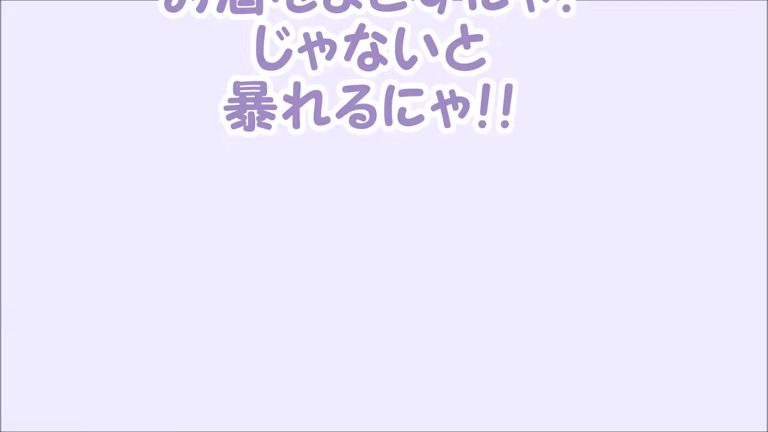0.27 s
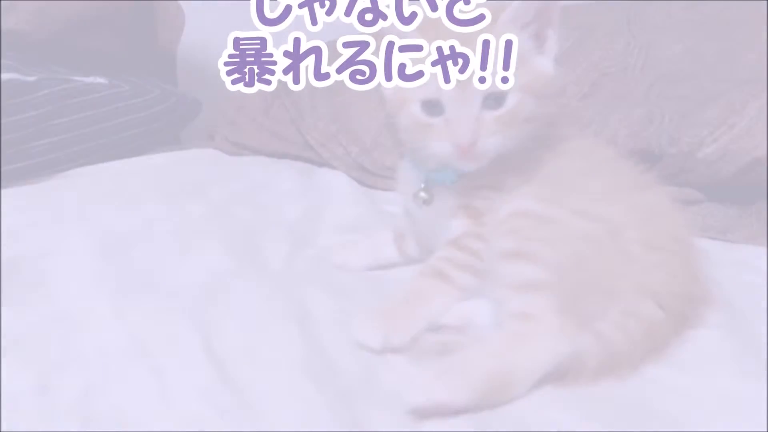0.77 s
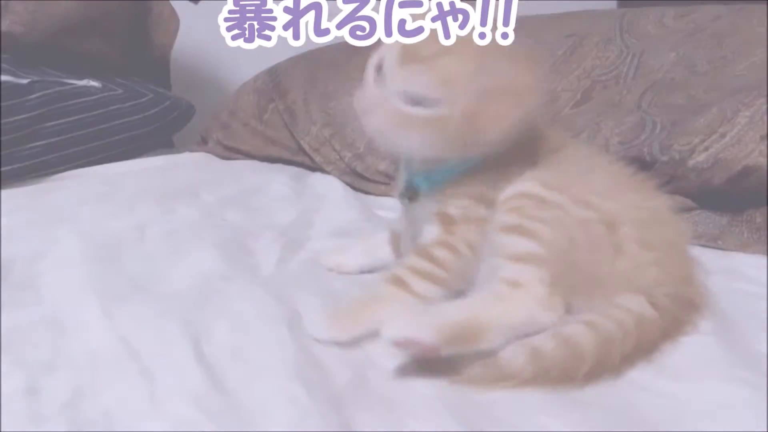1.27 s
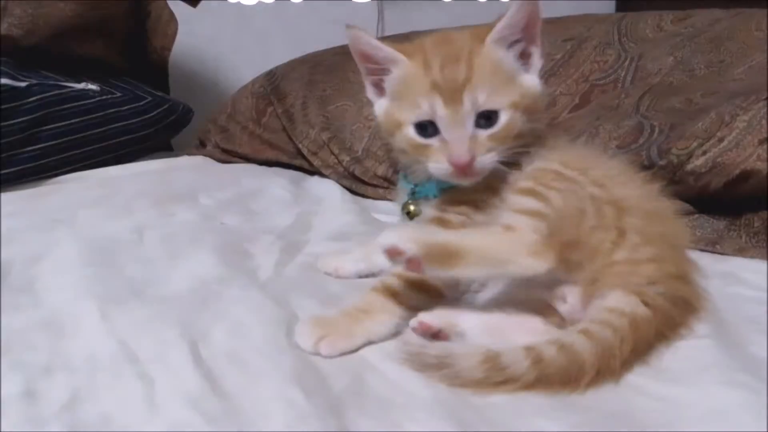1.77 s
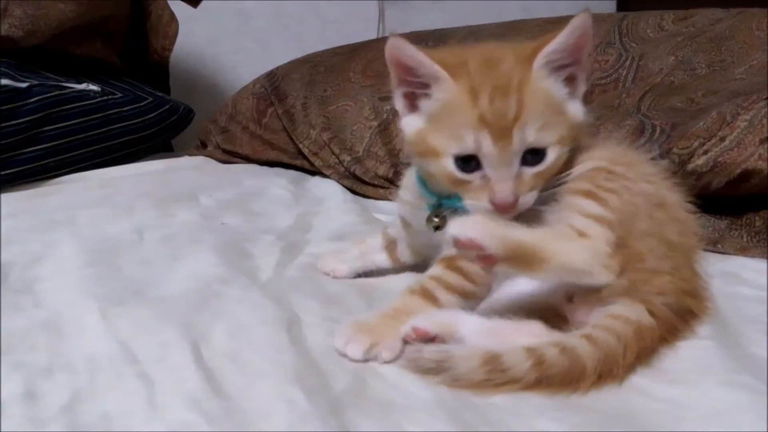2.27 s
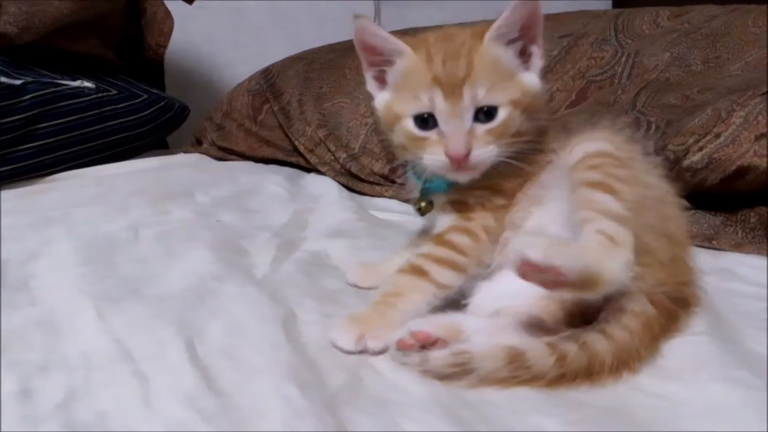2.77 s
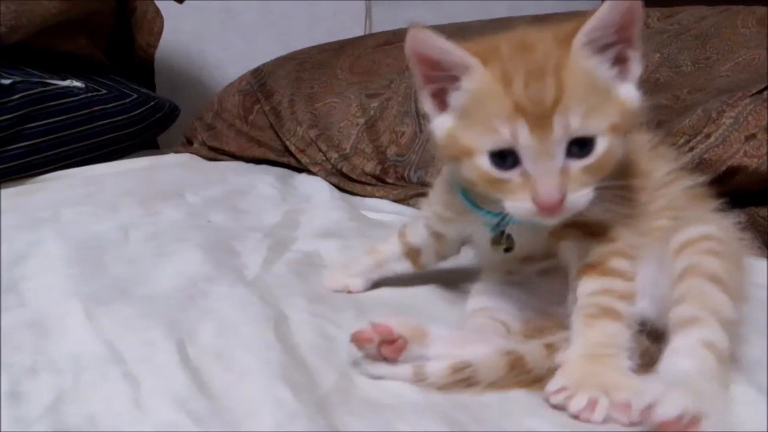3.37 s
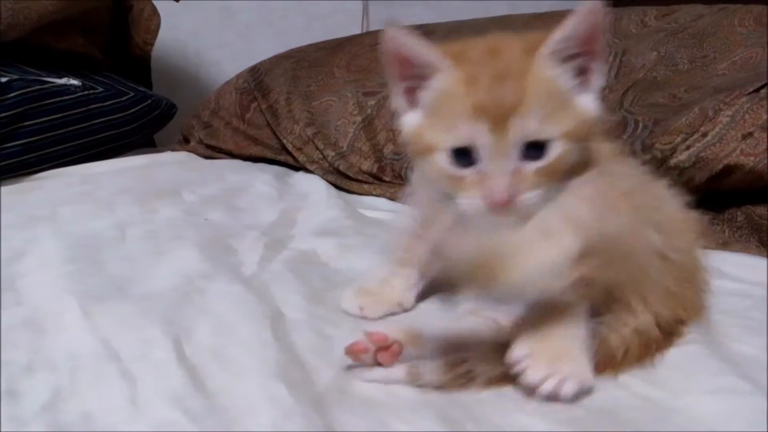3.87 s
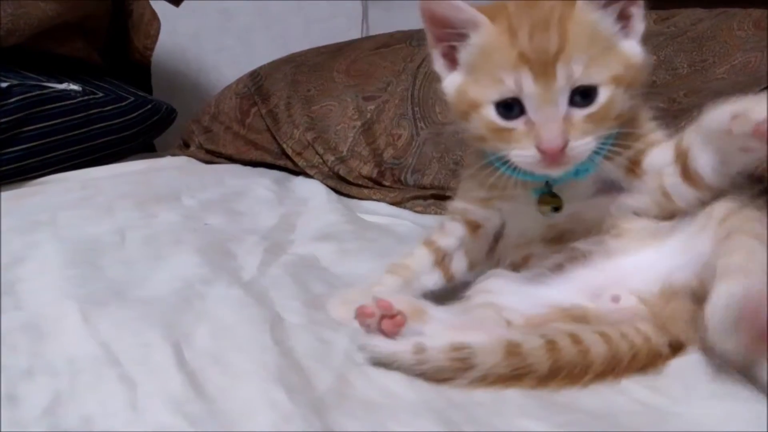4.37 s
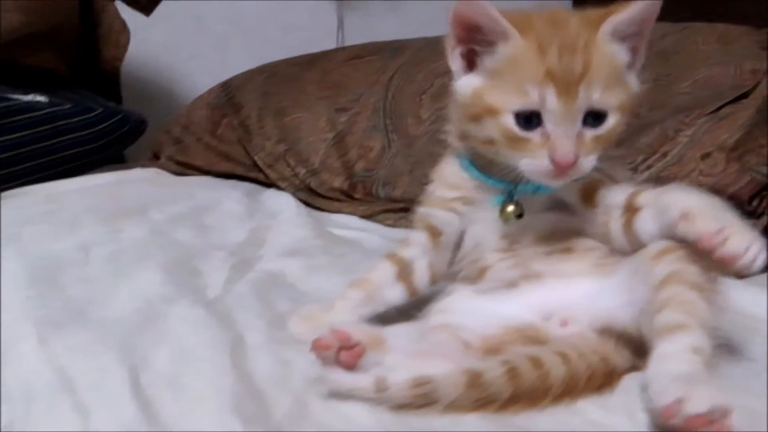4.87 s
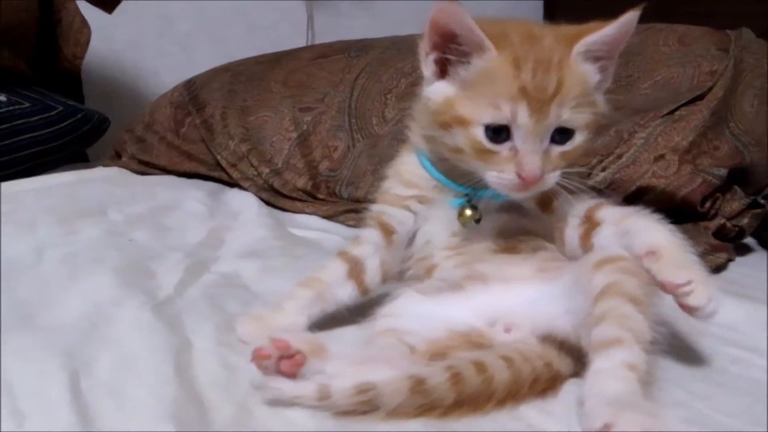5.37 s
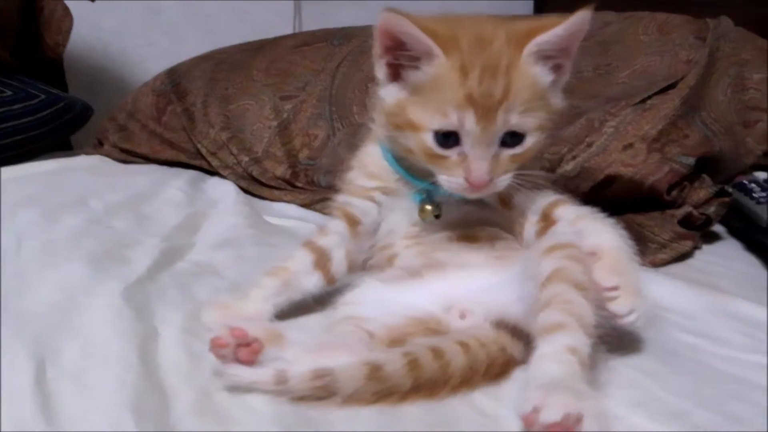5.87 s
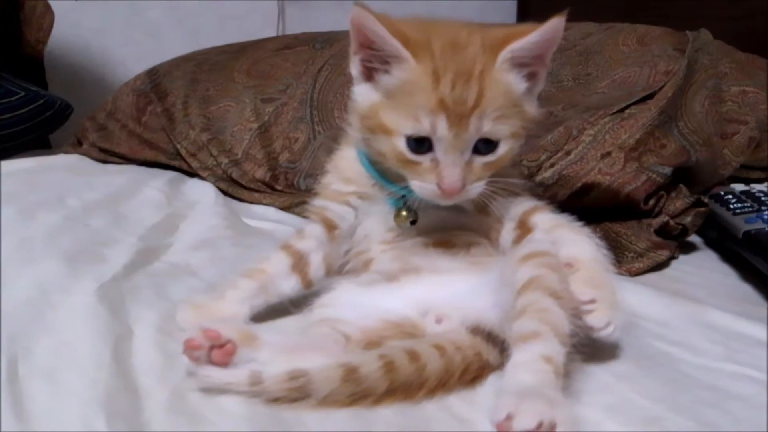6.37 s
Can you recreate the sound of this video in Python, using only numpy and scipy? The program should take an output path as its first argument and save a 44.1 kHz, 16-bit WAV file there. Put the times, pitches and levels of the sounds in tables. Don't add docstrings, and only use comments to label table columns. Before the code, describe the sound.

Quiet room, close hand-held microphone: low handling rumble, sharp plastic clicks and knocks, soft fur and cloth rustle, one bright bell clink with brief damped tinkles.

```python
import sys
import numpy as np
from scipy import signal
from scipy.fft import rfft, irfft, next_fast_len
from scipy.io import wavfile
from scipy.ndimage import uniform_filter1d

SR = 44100
rng = np.random.default_rng(int(sys.argv[2]) if len(sys.argv) > 2 else 0)


def level_to_linear(level):
    exponent = np.asarray(level, float) / 20
    return 10 ** exponent


def generate_wav(signal):
    frames = np.transpose(np.atleast_2d(signal))
    scaled = np.clip(frames, -1, 1) * 32767
    pcm = np.round(scaled).astype(np.int16)
    wavfile.write(sys.argv[1], SR, pcm)


N = 292383
ONSET_SHIFT_S = 0.000908

# f/Hz, density/dB
HISS_SPECTRUM = [(20, -10.5), (100, -2.5), (250, -8.5), (600, -13), (2500, -22), (5000, -25.5), (9000, -26),
                 (17000, -31)]


def evened(x):
    return x / np.sqrt(np.mean(x ** 2) + 1e-20)


def read(points, hz):
    f, value = np.transpose(points)
    return np.interp(np.log(hz + 1), np.log(f + 1), value)


def curve(rows, column):
    return np.interp(np.arange(N) / SR, [r[0] for r in rows], [r[column] for r in rows])


def noise(points):
    size = next_fast_len(N)
    spectrum = rfft(rng.standard_normal(size))
    shape = level_to_linear(read(points, np.fft.rfftfreq(size, 1 / SR)))
    return evened(irfft(spectrum * shape, size)[:N])


def mode(hz, t60, rise=0., turn=0.):
    t60 = max(t60, .001)
    t = np.arange(int(t60 * SR) + 40) / SR
    attack = 1 - np.exp(-t / (rise + 1e-6))
    return np.sin(2 * np.pi * (hz * t + turn)) * level_to_linear(-60 * t / t60) * attack


def add(mix, s, sound):
    part = mix[round(s * SR):][:len(sound)]
    part += sound[:len(part)]


def hiss():
    return noise(HISS_SPECTRUM) * level_to_linear(-54.5)


def swaying(effort_db):
    # t/s, peak level/dB, t60/s
    jolts = [
        (.92, -42.5, 0.32),
        (3.1, -48.5, 0.46),
        (4.52, -36, 0.37),
        (4.77, -40.5, 0.49),
        (5.03, -41.5, 0.85),
        (5.37, -41.5, 1.1),
        (5.75, -39.5, 0.34),
        (6.41, -38.5, 0.25),
    ]
    sway_db, sway_per_effort, rise_db_per_s = -55.5, 0.9, 600
    t = np.arange(N) / SR
    power = level_to_linear(sway_db + sway_per_effort * effort_db) ** 2
    for s, db, t60 in jolts:
        swell_db = np.minimum(rise_db_per_s * (t - s), -60 * (t - s) / t60)
        power = power + level_to_linear(db + swell_db) ** 2
    return np.sqrt(power)


def hand():
    # t/s, effort level/dB
    grip = [
        (0.47, -0.5),
        (0.8, 0),
        (1.2, 1),
        (2.0, -1.5),
        (4.2, -1),
        (4.6, 4.5),
        (5.4, 5.5),
        (6.2, 4),
        (6.6, -1.5),
    ]
    # f/Hz, density/dB
    sway_spectrum = [(12, -14), (25, 8), (60, 7.5), (100, -7.5), (200, -37.5)]
    # f/Hz, density/dB
    rumble_spectrum = [(50, -18), (90, -1.5), (250, -3), (600, -15), (1500, -32.5)]
    # t/s, peak level/dB, f/Hz, t60/s, direction
    swings = [
        (4.5103, -22, 235, .018, 1),
        (4.541, -25, 45, .1, 1),
        (5.7355, -29, 45, .09, 1),
        (2.7855, -26, 2100, .0015, 1),
        (4.8812, -20, 2100, .004, 1),
        (4.881, -15, 4300, .0016, 1),
        (6.3961, -7, 620, .003, -1),
    ]
    effort_db = curve(grip, column=1)
    out = noise(sway_spectrum) * swaying(effort_db) + noise(rumble_spectrum) * level_to_linear(-59.5 + effort_db)
    for s, db, hz, t60, way in swings:
        add(out, s, way * level_to_linear(db) * mode(hz, t60, rise=0.1 / hz))
    return out


def stirring():
    # middle t/s, length/s, level/dB, duller part re rustle/dB
    stirs = [(.72, .3, -64, -10), (1.0, .15, -66, -8), (1.248, .25, -60, -4), (1.5, .3, -70, -8),
             (1.98, 0.21, -65.5, -10), (2.416, 0.18, -60.5, -4), (2.95, 0.48, -64.5, -5),
             (3.21, .3, -60.5, -8), (3.61, 0.13, -58.5, -10), (3.78, 0.38, -64.5, -6),
             (4.028, 0.29, -64, -4), (4.35, .35, -70, -8), (4.722, 0.34, -66, -4), (4.95, 0.29, -64, -10),
             (5.17, 0.38, -68, -5.5), (5.457, 0.29, -60.5, 3.5), (5.814, 0.31, -66, 8.5),
             (6.13, 0.24, -71, 7)]
    strong = np.full(N, level_to_linear(-71) ** 2)
    wide = strong * level_to_linear(-7) ** 2
    for middle, length, db, dull_db in stirs:
        power = level_to_linear(db) ** 2 * np.hanning(int(length * SR))
        add(strong, middle - length / 2, power)
        add(wide, middle - length / 2, power * level_to_linear(dull_db) ** 2)
    return strong, wide


def cloth():
    # f/Hz, density/dB
    cloth_spectrum = [(1200, 5.5), (2500, 4.5), (4000, 8), (6000, 13.5), (10000, 7.5), (12000, -54),
                      (16000, -27)]
    # f/Hz, width/Hz
    port = (7780, 1800)
    # t/s, level/dB, rise/s, t60/s, duller part re scuff/dB
    scuffs = [(1.054, -50, .003, 0.19, -7), (4.512, -48, .003, 0.09, -10), (4.608, -48.5, 0.0033, 0.13, 3),
              (4.881, -61, 0.0017, 0.21, 11), (5.063, -50, 0.008, 0.26, 2), (5.245, -59, .004, 0.12, 5),
              (5.542, -53.5, 0.004, 0.58, 6.5), (5.614, -57, 0.0039, 0.15, 6),
              (5.773, -63, 0.0029, 0.038, 11.5), (5.988, -47.5, 0.027, 0.16, 1.5),
              (6.252, -65.5, 0.0037, 0.34, 11.5), (6.426, -53.5, 0.0032, 0.12, 7.5),
              (6.461, -56.5, 0.0064, 0.17, 10.5)]
    grain = level_to_linear(1.2 * evened(uniform_filter1d(rng.standard_normal(N), size=60)))
    rub = noise(cloth_spectrum) * grain
    b, a = signal.butter(1, [port[0] - port[1] / 2, port[0] + port[1] / 2], "band", fs=SR)
    bright = evened(signal.lfilter(b, a, signal.lfilter(b, a, rub)))
    dull = evened(rub)
    strong, wide = stirring()
    t = np.arange(SR // 4) / SR
    for s, db, rise, t60, dull_db in scuffs:
        decay = level_to_linear(db - 60 * np.maximum(t - rise, 0) / t60)
        power = (decay * np.minimum(t / rise, 1)) ** 2
        add(strong, s, power)
        add(wide, s, power * level_to_linear(dull_db) ** 2)
    return bright * np.sqrt(strong) + dull * np.sqrt(wide)


def cracks():
    # t/s, peak level/dB, port ring f/Hz, lower click re
    # peak/dB, lower click f/Hz
    singles = [(0.84, -21, 7750, -50, 6500), (0.9287, -10, 7920, -18, 6340), (1.0509, -26, 7600, -15, 5250),
               (2.3575, -42, 8200, -30, 6000), (2.6195, -41, 8400, -28, 6500),
               (1.1573, -20, 7800, -52, 6500), (2.4003, -38, 8540, -30, 2620), (2.702, -42, 9240, -28, 3830),
               (2.708, -40, 8900, -31, 2580), (3.0026, -39.5, 7900, -7, 3720),
               (3.08735, -21, 7550, -17, 6140), (3.088, -23.5, 7600, -8, 5950),
               (3.1125, -34.5, 7420, -10, 6220), (4.2939, -20, 7730, -16.5, 6200),
               (4.29456, -30, 7500, -18, 6000), (4.3191, -44, 8000, -8, 5840),
               (4.5091, -3.5, 7940, -24, 5800), (4.5318, -28, 7740, -23, 4580),
               (4.8801, -14, 7640, -15.5, 2920), (4.8847, -32, 7790, -6, 2600),
               (5.748, -30, 7820, -24, 5270), (5.862, -27.5, 7300, -12, 5750), (5.9578, -38, 7200, -5, 5650)]
    # t/s, peak level/dB, lower click re peak/dB, lower click f/Hz
    creeps = [(4.6511, -23.5, -13, 6240), (4.6662, -24, -20, 6400), (4.6792, -27, -17, 6440),
              (4.7176, -17.5, -25, 6500), (4.7483, -20.5, -34, 4940), (4.7743, -26.5, -26, 5330),
              (4.804, -22.5, -32, 5170), (4.8556, -15.5, -23, 6560), (4.877, -22, -18, 6000),
              (4.9637, -25.5, -20.5, 5600), (5.0125, -22, -22, 5550), (5.0393, -23, -13, 6150),
              (5.3054, -22.5, -21, 6500), (5.3649, -31, -26, 6350), (5.394, -31.5, -17, 6000),
              (5.7344, -18, -19.5, 6100), (5.901, -18.5, -19.5, 6200), (6.315, -18.5, -30, 6500)]
    seam_hz = 8050
    ring_s, ring_s_per_db, ring_max_s = .0022, .00004, .005
    ring_slope = 4
    out = np.zeros(N)
    t = np.arange(1500) / SR
    slips = singles + [(s, db, seam_hz, low_db, low_hz) for s, db, low_db, low_hz in creeps]
    room_band = signal.butter(1, [5000, 11500], "band", fs=SR)
    tails = signal.lfilter(*room_band, rng.standard_normal((len(slips), 1500)))
    for (s, db, hz, low_db, low_hz), delay, tail in zip(slips, rng.random(len(slips)), tails):
        t60 = min((ring_s - ring_s_per_db * db) * (seam_hz / hz) ** ring_slope, ring_max_s)
        one = level_to_linear(-23.5 - 60 * t / 0.018) * tail
        add(one, 0, -mode(hz, t60, rise=.00008))
        add(one, 0, -level_to_linear(low_db + 18.5) * mode(low_hz, 13 / low_hz, rise=.00008))
        add(one, 0, level_to_linear(-12) * mode(10000, .0011, rise=.00008))
        add(one, 0, -level_to_linear(-21) * mode(12500, .0018, rise=.00008))
        add(one, 0.00041 + 0.00063 * delay, 0.09 * one.copy())
        add(out, s + ONSET_SHIFT_S, level_to_linear(db) * one / abs(one).max())
    out = signal.lfilter(*signal.butter(1, 1800, "high", fs=SR), out)
    return signal.lfilter(*signal.butter(2, 13500, fs=SR), out)


def knocks():
    # t/s, thud peak level/dB, panel re thud/dB, shell re thud/dB
    presses = [(0.93, -30.5, 15, 3.5), (1.5969, -40, 2, -1.5), (1.8824, -38.5, 4, -3.5),
               (2.7841, -40, -8, 8), (3.0881, -29.5, 8.5, 2), (3.1135, -34.8, 7, 1),
               (4.6532, -33, 13, -1.5), (4.6677, -35, 11.5, -5), (4.6808, -35, 12, -4),
               (4.7195, -32.5, 10, -3.5), (4.7502, -34, 1, -4.5), (4.7754, -39, 7, -6),
               (4.8053, -31, 4, -8.5), (4.857, -26, 0, -8), (4.8781, -28, 2, -6), (4.881, -35.5, 10, 13.5),
               (4.9654, -30, -20, -7), (5.014, -32, 6, -3), (5.0411, -31.5, -5, -4.5),
               (5.0616, -32.5, 1, -11), (5.3065, -31, 10.5, -6), (5.366, -31.5, 2, -10),
               (5.3963, -35, 6, -10.5), (5.4146, -35, -5, -7), (5.904, -33.5, -16, -1),
               (6.103, -37, -13, -11), (6.3177, -35, 17, -0.5)]
    # t/s, thud peak level/dB, panel re thud/dB, shell re thud/dB, shell f/Hz
    releases = [
        (4.2954, -38, 8, 4, 1230),
        (4.51, -29, 0, 4.5, 1240),
        (4.532, -33, 2, -12, 942),
        (4.59, -43.5, -8, 1.5, 930),
        (5.7344, -32.5, -1, -8, 1120),
        (5.7483, -48, 7, 2, 1130),
        (6.039, -44.5, 8, 1, 935),
        (6.2485, -43, 4, -3, 776),
        (6.367, -47, 1.2, 3, 813),
        (6.3958, -21.5, -20, -9.5, 870),
    ]
    # f/Hz, t60/s
    panel = (542, 0.015)
    press_thud_hz, press_shell_hz, release_thud_hz = 106, 986, 147
    out = np.zeros(N)
    pressed = [(*row, press_shell_hz) for row in presses]
    for way, hz, rows in ((-0.66, press_thud_hz, pressed), (1, release_thud_hz, releases)):
        for s, db, panel_db, shell_db, shell_hz in rows:
            add(out, s, way * level_to_linear(db + 8.5) * mode(hz, 2.47 / hz, rise=0.00042))
            add(out, s, -way * level_to_linear(db + panel_db - 5) * mode(*panel, rise=0.00072))
            add(out, s, -way * level_to_linear(db + shell_db + 6.0) * mode(shell_hz, 8 / shell_hz, rise=0.00024))
            add(out, s, way * level_to_linear(db + shell_db - 3.0) * mode(1.85 * shell_hz, 6 / shell_hz, rise=.0001))
    return out


def bell():
    # t/s, level/dB, f/Hz, t60/s
    clink = (1.0522, -4.5, 7560, .0052)
    # t/s, peak level/dB, f/Hz
    tinkles = [(1.1914, -48, 7350), (1.2022, -35, 7350), (1.2106, -28, 7310), (1.2384, -46, 7240),
               (1.2506, -40, 7300), (1.2684, -41, 7250), (1.3004, -53, 7250), (1.3269, -44, 7500),
               (1.334, -47, 7360), (1.3763, -49, 7500), (1.4701, -52, 7280), (1.4436, -54, 7450),
               (1.5474, -53, 7710)]
    # f ratio, level/dB, share of the t60
    overtones = [(1.08, -7, .45)]
    t60 = .026
    out = np.zeros(N)
    add(out, clink[0], level_to_linear(clink[1]) * mode(*clink[2:], rise=0.00012))
    for s, db, hz in tinkles:
        add(out, s + ONSET_SHIFT_S, level_to_linear(db + 1.5) * mode(hz, t60, rise=.0008))
        for ratio, over_db, share in overtones:
            over = mode(hz * ratio, t60 * share, rise=.0006)
            add(out, s + ONSET_SHIFT_S, level_to_linear(db + over_db) * over)
    return out


def rattle():
    # t/s, level/dB, t60/s, touches per s
    rolling = (1.19, -51, 1, 500)
    s, db, t60, per_s = rolling
    t = np.arange(N) / SR - s
    touches = (rng.random(N) < per_s / SR) * rng.standard_normal(N)
    touches = touches * (t > 0) * level_to_linear(db - 60 * np.maximum(t, 0) / t60)
    rings = (mode(7380, 0.017, rise=.0003), .6 * mode(7900, .012, rise=.0002))
    return sum(signal.oaconvolve(touches, ring)[:N] for ring in rings)


def chatters():
    # t/s, peak level/dB, slips per s, slips, ring f/Hz
    runs = [
        (2.78485, -15, 3680, 5, 7000),
        (6.3969, -15, 5000, 2, 9000),
    ]
    out = np.zeros(N)
    chances = rng.uniform(-0.74, 1, (len(runs), 5, 2))
    for (s, db, per_s, count, hz), chance in zip(runs, chances):
        for k, swell in enumerate(signal.windows.tukey(count + 2, .6)[1:-1]):
            at = s + (k + .22 * chance[k, 0]) / per_s
            size = swell * level_to_linear(db + 7 * chance[k, 1] - 2)
            add(out, at, level_to_linear(-3) * size * mode(hz, 0.0015, rise=.00005))
            add(out, at, level_to_linear(1.5) * size * mode(4200, .0008, rise=.00005))
            add(out, at, level_to_linear(-9) * size * mode(11800, .0008, rise=.00003))
    return out


def scene():
    casing = cracks() + chatters() + knocks() + hand()
    return (casing + bell() + cloth() + hiss() + rattle())[None]


def starve(x):
    # t/s, length/s, depth/dB, lowest f/Hz, share of bands kept
    starved = [(2.433, .012, -14, 1500, .3), (2.925, .011, -14, 900, .25), (3.224, .011, -15, 800, .3),
               (3.629, .011, -11, 1700, .1), (4.566, .012, -20, 2000, .3), (4.672, .04, -30, 11800, 0),
               (4.699, .013, -30, 1150, .2), (4.783, .013, -30, 1250, .15), (5.207, .012, -14, 1200, .15),
               (5.906, .034, -60, 1100, .06), (5.996, .011, -14, 1800, .4)]
    hz, t, z = signal.stft(x, SR, nperseg=1024, noverlap=768)
    draws = rng.random((len(hz) // 3 + 1, len(t) // 6 + 1))
    draws = np.repeat(np.repeat(draws, 3, axis=0), 6, axis=1)[:len(hz), :len(t)]
    treble = abs(z[hz > 11500])
    calm = treble.mean(axis=0) < 2 * np.median(treble)
    dropped = draws < .35 * np.clip((hz[:, None] - 11500) / 4000, 0, 1)
    z = z * level_to_linear(-30 * calm * dropped + 1.2 * (hz[:, None] > 12500))
    x = signal.istft(z, SR, nperseg=1024, noverlap=768)[1]

    hz, t, z = signal.stft(x, SR, nperseg=256, noverlap=192)
    for s, length, depth_db, low_hz, share in starved:
        inside = np.clip(np.minimum(t - s, s + length - t) / .004 + .5, 0, 1)
        standing = abs(z) @ (inside == 1) / level_to_linear(read(HISS_SPECTRUM, hz))
        above = hz > low_hz
        peaks = (standing > np.roll(standing, 1)) & (standing > np.roll(standing, -1)) & above
        lost = above & ~(peaks & (standing > np.quantile(standing[peaks], 1 - 2 * share)))
        z = z * level_to_linear((depth_db * lost + 6 * (~lost & above))[:, None] * inside)
    return signal.istft(z, SR, nperseg=256, noverlap=192)[1][:N]


def roll_off(x):
    return signal.sosfilt(signal.butter(12, 16970, fs=SR, output="sos"), x)


def record(dry):
    edge_hz, start_s, converter_offset = 15780, 0.468, -0.0026
    x = starve(dry[0])
    low = signal.oaconvolve(x, signal.firwin(511, edge_hz, window=("kaiser", 9), fs=SR), "same")
    top = signal.oaconvolve(x - low, signal.firwin(255, 16800, window=("kaiser", 9), fs=SR), "same")
    jumps = abs(np.diff(x, prepend=0)) > level_to_linear(-27)
    sharp = uniform_filter1d(1. * jumps, size=300) > 1e-4
    x = low + top * uniform_filter1d(1. * sharp, size=200) + converter_offset
    x *= np.clip((np.arange(N) / SR - start_s) / 0.0028, 0, 1)
    return roll_off(x[None])


dry = scene()
out = record(dry)
generate_wav(out)
```